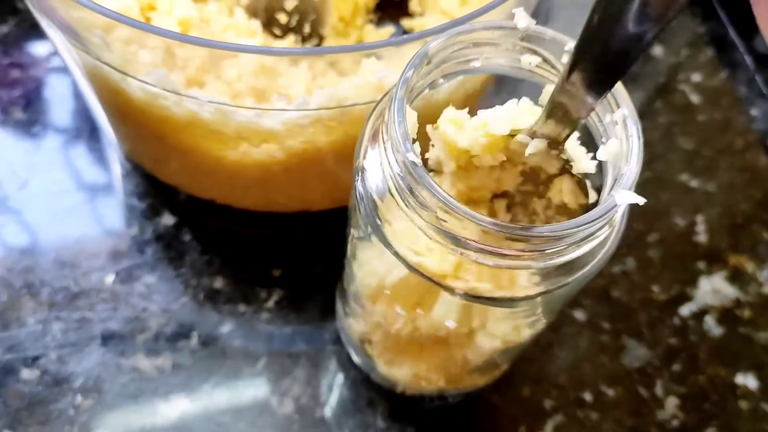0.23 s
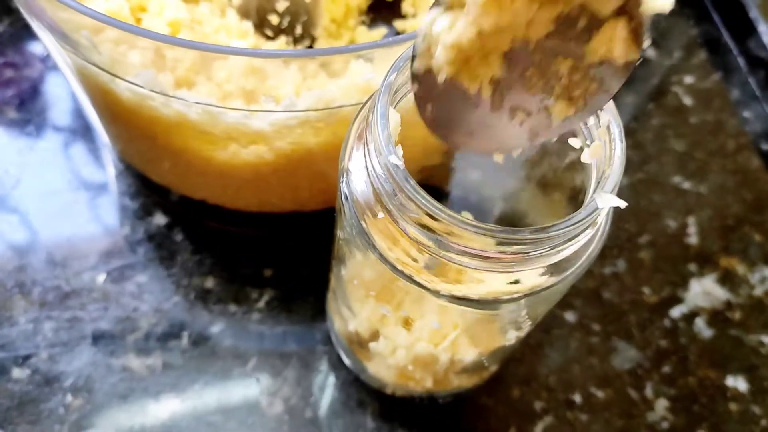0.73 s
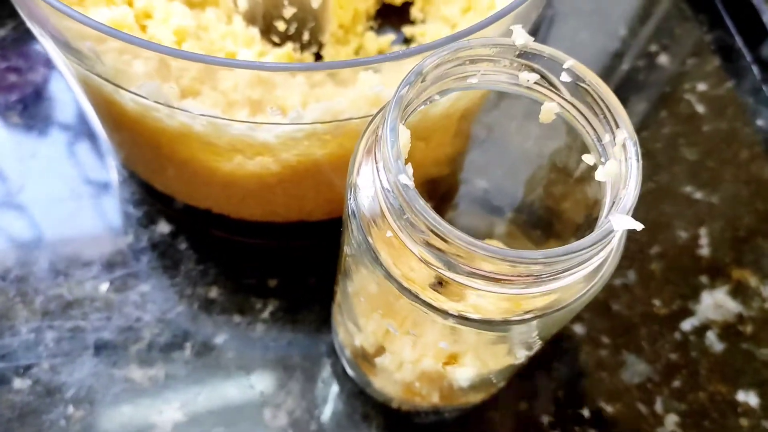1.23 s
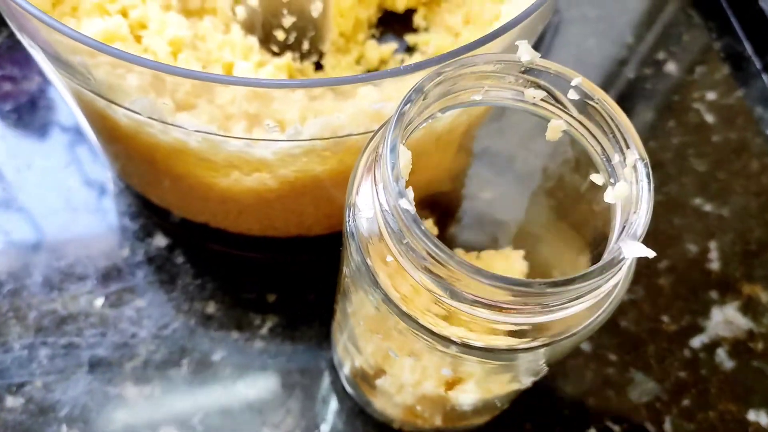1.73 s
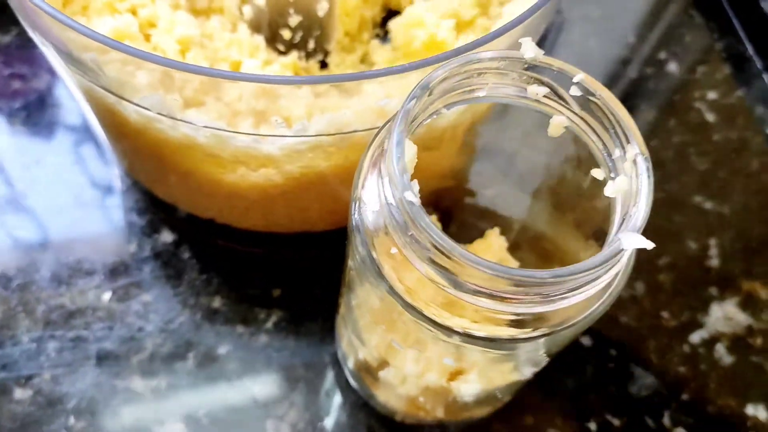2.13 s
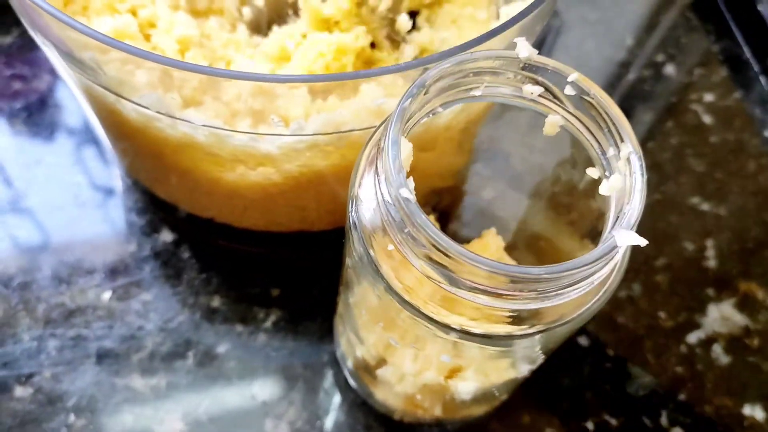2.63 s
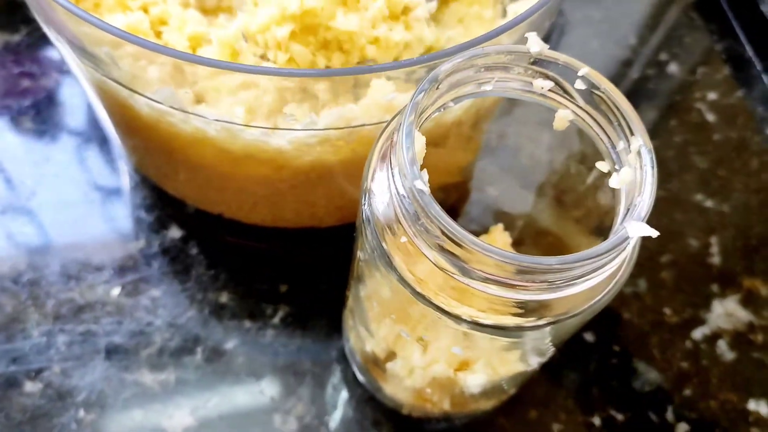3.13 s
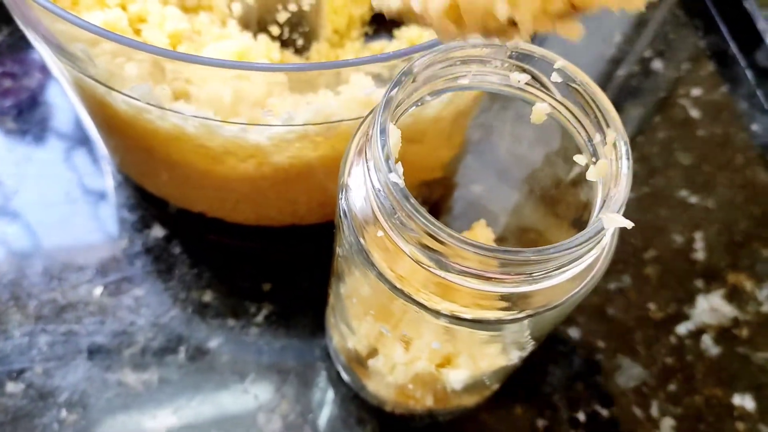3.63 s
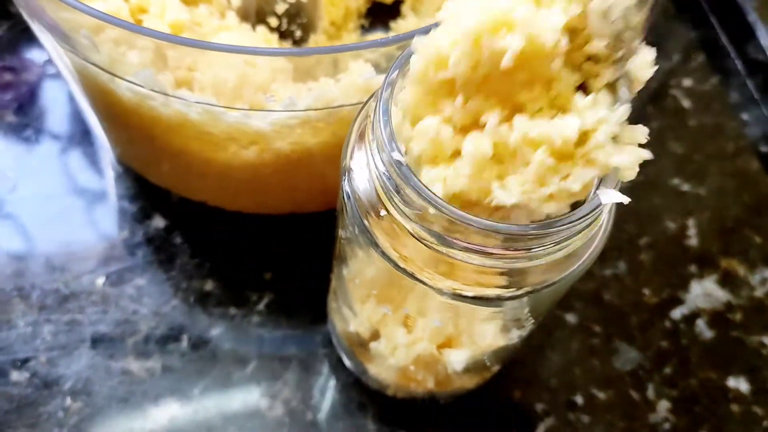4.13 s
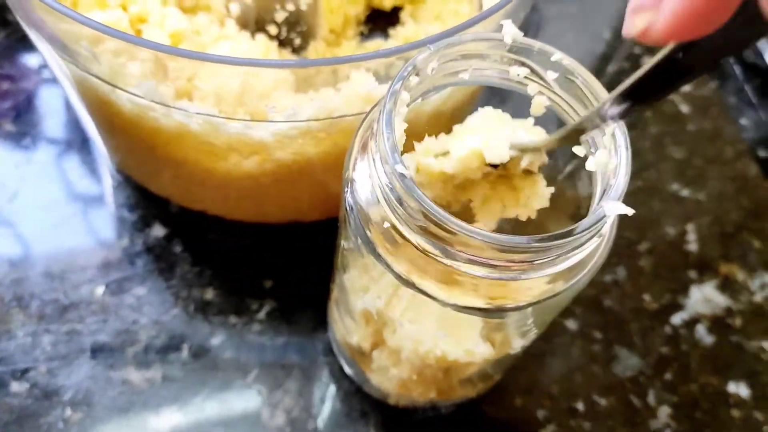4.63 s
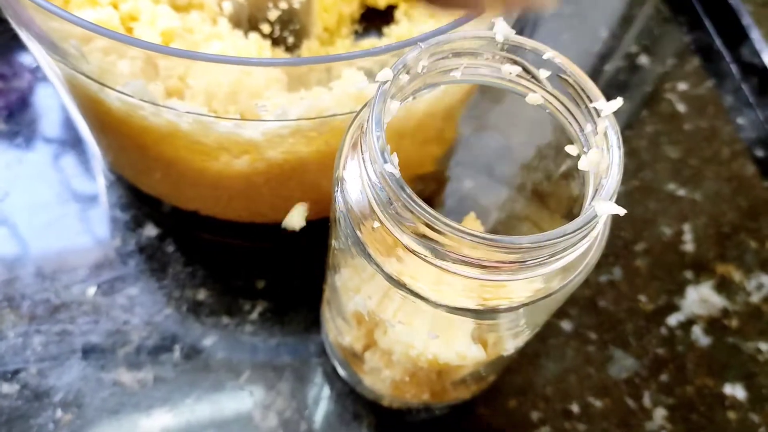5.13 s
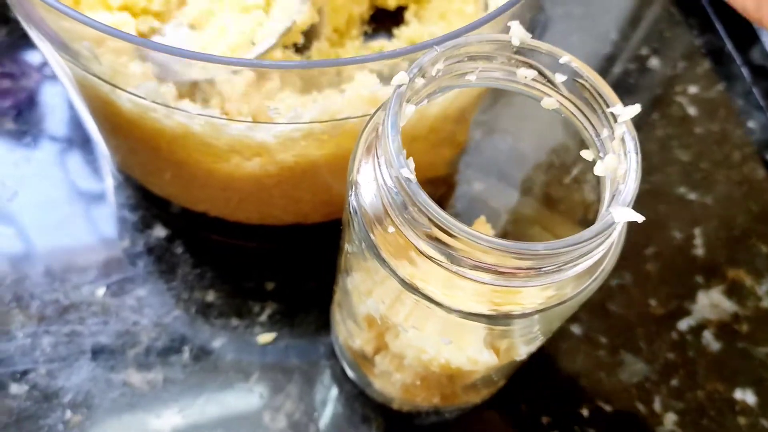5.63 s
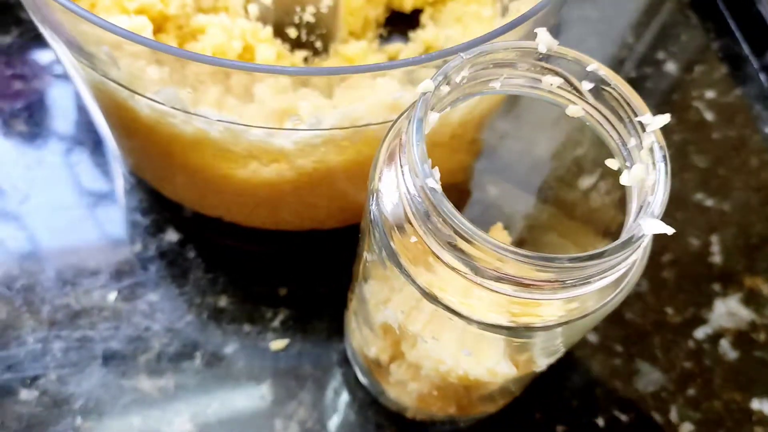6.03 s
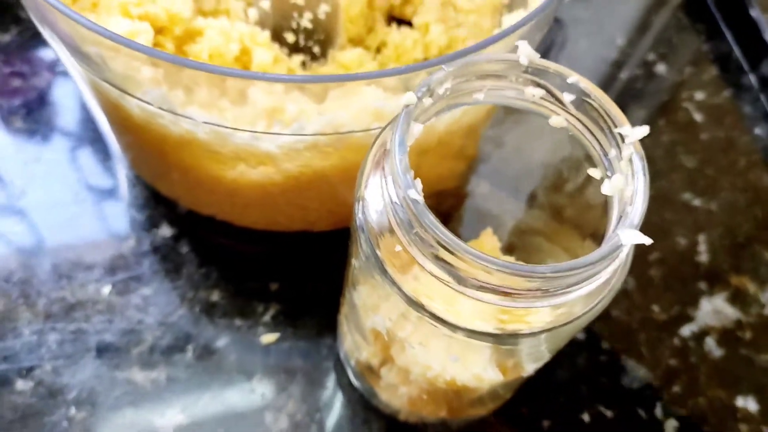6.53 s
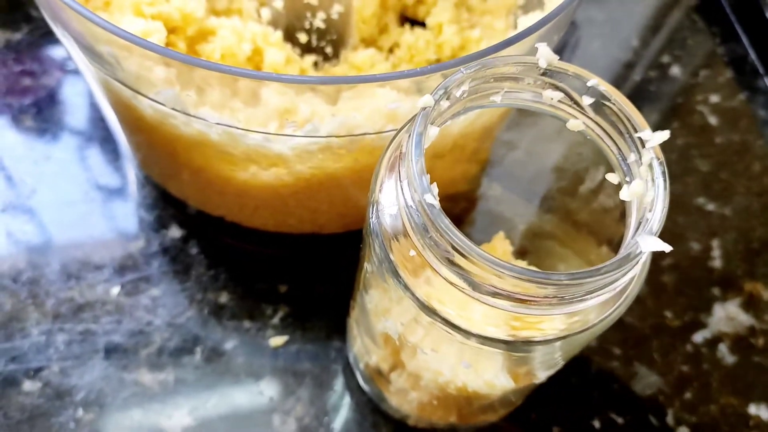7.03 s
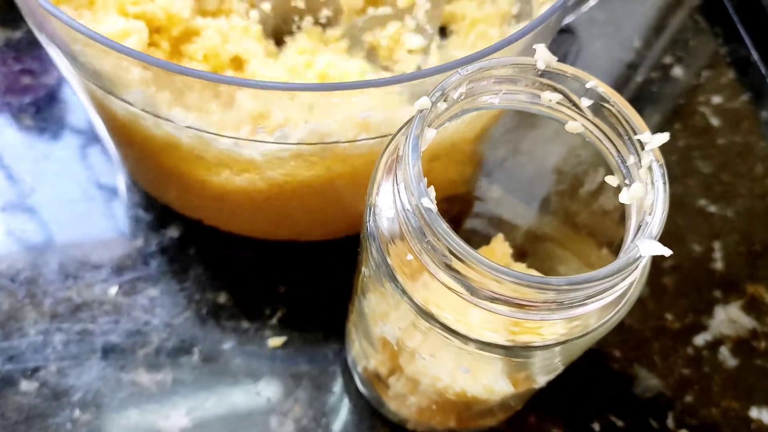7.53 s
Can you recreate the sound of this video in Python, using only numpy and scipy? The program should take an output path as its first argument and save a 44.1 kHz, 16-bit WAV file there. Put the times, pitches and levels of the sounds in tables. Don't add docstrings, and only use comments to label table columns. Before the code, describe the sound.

A small, hard-surfaced kitchen is heard close up through a handheld stereo recorder, with faint appliance hum, far traffic and low hand rumble. At 0.55 s a steel spoon gives a clear, bright clink on a glass jar. Faint gritty, wet scrapes in a plastic bowl follow, strongest from 1.7 to 2.4 s, with a moderate dull knock at 2.25 and a small tap at 2.6. It stays quiet until light glass touches at 4.15-4.2, the loudest ringing clink at 4.75 and a soft rebound at 4.93. A faint scrape comes near 5.6. At 6.0 a brief squealing scrape leads into three very loud, hollow plastic knocks at 6.23, 6.38 and 6.51, slightly overloaded, with rattling bounces and a short room echo. Weaker knocks follow at 7.17 and 7.33, then a crunchy scrape at 7.5 and small closing tick at 7.66, amid handling rumble.

```python
import sys
import numpy as np
from scipy import signal
from scipy.fft import rfft, irfft, next_fast_len
from scipy.io import wavfile
from scipy.ndimage import map_coordinates

SR = 44100
rng = np.random.default_rng(int(sys.argv[2]) if len(sys.argv) > 2 else 0)


def unload_audio(sound):
    columns = np.transpose(np.atleast_2d(sound))
    steps = np.round(np.clip(columns, -1, 1) * 32767)
    wavfile.write(sys.argv[1], SR, steps.astype(np.int16))


def magnitude_from_level(level_db):
    exponent = np.asarray(level_db, float) / 20
    return 10 ** exponent


N = 342657
EDGES_HZ = 22 * 2 ** np.arange(0, 9.7, .4)
CENTRES_HZ = np.sqrt(EDGES_HZ[1:] * EDGES_HZ[:-1])
BANK = [signal.butter(2, edges, "band", fs=SR, output="sos") for edges in zip(EDGES_HZ, EDGES_HZ[1:])]
HALVES = np.array([[.5], [-.5]])
SWELL_RISE, SWELL_SAG_DB = .4, 6


def rms_one(x):
    return x / np.sqrt(np.mean(x ** 2) + 1e-20)


def at_hz(hz_points, values, hz):
    return np.interp(np.log(hz), np.log(hz_points), values)


def drift(rate):
    knots = rng.standard_normal(int(N / SR * rate) + 3)
    coarse = np.arange(0, N + 32, 32)
    curve = map_coordinates(knots, [coarse / SR * rate], order=3)
    return np.interp(np.arange(N), coarse, curve)


def mix(gains, bands):
    return np.tensordot(gains.astype(np.float32), bands, 1)


def strokes(rows, rise, sag_db, quiet_db):
    power = np.full((len(rows[0]) - 2, N + SR), magnitude_from_level(2 * quiet_db))
    for s, length, *level_db in rows:
        u = np.linspace(0, 1, int(length * SR))
        sag = magnitude_from_level(-sag_db * np.maximum(u - rise, 0))
        let_go = np.minimum(8 * (1 - u), 1)
        shape = np.minimum(u / rise, 1) * sag * let_go
        power[:, round(s * SR):][:, :len(u)] += (magnitude_from_level(np.array(level_db))[:, None] * shape) ** 2
    return 10 * np.log10(power[:, :N])


def resonance(x, hz, width_hz):
    r = np.exp(-np.pi * width_hz / SR)
    poles = [1, -2 * r * np.cos(2 * np.pi * hz / SR), r * r]
    return signal.lfilter((1 - r * r) / 2 * np.array([1, 0, -1]), poles, x)


def bowed(source, levels_db, modes):
    out = 0
    for db, (hz, wide, pan_db) in zip(levels_db, modes):
        tone = rms_one(resonance(resonance(source, hz, wide), hz, wide))
        out = out + magnitude_from_level(db + pan_db * HALVES) * tone
    return out


# f/Hz, likeness/-1 to 1
LIKENESS = [(60, -0.45), (130, 0.72), (290, 0.64), (630, 0.26), (1390, 0.23), (3060, -1.1), (6710, 0.65),
            (14700, 0.78)]


def noise_bands(length):
    white = rng.standard_normal((2, 2, length))
    bands = np.empty((len(BANK), 2, length), np.float32)
    alike = np.clip(at_hz(*np.transpose(LIKENESS), CENTRES_HZ), -1, 1)
    alike = np.maximum(alike, .65 * (CENTRES_HZ < 250))
    for k, band in enumerate(BANK):
        weights = np.sqrt(1 + alike[k] * np.array([[1], [-1]]))
        mid, side = signal.sosfilt(band, white[k % 2]) * weights
        bands[k] = mid + side, mid - side
    return bands


# f/Hz, density/dB per Hz
HUM = [(47, -31), (80, -4), (167, -3.5), (231, -8), (398, -15), (483, -18), (778, -12), (1010, -20),
       (2860, -25), (7740, -34), (8630, -35.5), (13300, -36.5), (14200, -28)]


def room_hum(noise, patchy_db):
    gains = magnitude_from_level(at_hz(*np.transpose(HUM), CENTRES_HZ)) * (CENTRES_HZ > 90)
    flickers = (CENTRES_HZ > 90) & (CENTRES_HZ < 1500)
    hum = mix(gains * ~flickers, noise)
    for gain, band in zip(gains[flickers], noise[flickers]):
        hum = hum + gain * band * magnitude_from_level(patchy_db * drift(2.738))
    return magnitude_from_level(-64.5) * rms_one(hum)


# t/s, length/s, level/dB
RUMBLE = [
    (3.0, 0.8, -55.5),
    (3.5, 1, -57.5),
    (6.15, 0.8, -50),
    (6.9, 0.59, -50),
    (7.45, 0.42, -48.5),
]


def hand_rumble(noise):
    low = mix((CENTRES_HZ < 90) * (30 / CENTRES_HZ) ** 0.99, noise)
    level_db = strokes(RUMBLE, SWELL_RISE, SWELL_SAG_DB, quiet_db=-63.5) + 1.6 * drift(4.5)
    return magnitude_from_level(level_db) * rms_one(low)


# t/s, length/s, drag level/dB, wet hiss level/dB, wall squeal level/dB
DRAGS = [(0.0, 0.19, -73, -80, -63.5), (.13, 0.13, -85, -73, -81), (.72, 0.15, -80, -100, -58.5),
         (1.13, 0.17, -69.5, -88, -78), (1.7, 0.14, -69.5, -73.5, -62), (1.8, 0.57, -67.5, -70, -74),
         (1.98, 0.28, -63.5, -90, -75), (2.12, 0.36, -67.5, -70, -89), (4.38, 0.1, -82, -73, -85),
         (5.59, 0.21, -68.5, -76, -88), (6.008, 0.12, -54, -74, -45), (6.11, 0.12, -62, -96, -56.5),
         (7.0, 0.17, -69, -84, -69), (7.482, 0.07, -42.5, -57, -75), (7.53, 0.14, -52, -56, -77),
         (7.64, 0.079, -58.5, -71, -55.5)]
# f/Hz, density/dB per Hz
DRAG_COLOUR = [(150, -25.5), (250, -8.5), (570, -10.5), (806, -7), (1110, -10.5), (1250, -6.5),
               (1700, -12.5), (3620, -13), (3970, -16), (6000, -22), (7800, -54), (13200, -120)]


def drags(noise, grit_db, squeal_hz):
    levels_db = strokes(DRAGS, rise=0.16, sag_db=8, quiet_db=-120)
    level_db, hiss_db, squeal_db = levels_db + drift(25)
    grit = magnitude_from_level(grit_db * drift(150))
    colour = magnitude_from_level(at_hz(*np.transpose(DRAG_COLOUR), CENTRES_HZ)) * (CENTRES_HZ < 6000)
    body = rms_one(mix(colour, noise)[:, ::-1])
    hiss = rms_one(mix(CENTRES_HZ > 6000, noise)[:, ::-1])
    edge = resonance(body, 1300, 150) + 4.7 * resonance(body, 2050, 220) + 1.2 * resonance(body, 3650, 250)
    squeal = rms_one(resonance(resonance(body, squeal_hz, 110), squeal_hz, 110))
    rub = magnitude_from_level(level_db) * (magnitude_from_level(-1.5) * body + magnitude_from_level(-10.5) * rms_one(edge)) + magnitude_from_level(hiss_db) * hiss
    return grit * rub + magnitude_from_level(squeal_db - 5.0) * squeal


# t/s, peak level/dB,
# f/Hz, t60/s
SQUEAKS = [(.012, -85, 3545, 0.4), (0.372, -64.5, 1150, .027), (.785, -56.5, 1172, 0.019),
           (1.161, -79, 2103, 0.19), (1.636, -49.5, 3770, 0.0079), (1.929, -58.5, 216, 0.068),
           (2.054, -59, 1340, 0.024), (2.609, -37.5, 1460, 0.01), (4.1534, -40.5, 3290, 0.027),
           (4.1541, -56, 825, 0.13), (4.193, -27.5, 1090, 0.0084), (4.1931, -38, 3590, 0.012),
           (4.206, -68, 1190, 0.1), (4.512, -77, 3560, 0.084), (4.9341, -36.5, 3565, 0.033),
           (5.783, -65, 3510, 0.023), (6.012, -67, 4220, 0.028), (6.2222, -40, 6500, 0.012),
           (6.2235, -36, 3900, 0.012), (6.3728, -36, 3800, 0.012), (6.3735, -32, 1900, 0.012),
           (7.166, -52, 3700, 0.012), (5.046, -66, 6300, 0.012), (7.3346, -32.5, 1480, 0.014),
           (7.336, -28.5, 405, 0.023), (7.493, -55, 2002, 0.033), (7.506, -38.5, 1417, 0.019),
           (7.507, -44.5, 654, 0.035), (7.526, -44, 1210, 0.046), (7.541, -50, 3620, 0.031),
           (7.606, -49, 1256, 0.041)]


def squeaks(rise_s, glide_hz_per_s):
    t, out = np.arange(SR // 10) / SR, np.zeros(N)
    for s, peak_db, hz, t60 in SQUEAKS:
        sliding_hz = hz + glide_hz_per_s * t * (1000 < hz < 2000)
        ring = np.sin(2 * np.pi * t * sliding_hz) * (1 - np.exp(-t / rise_s))
        out[round(s * SR):][:len(t)] += magnitude_from_level(peak_db + 12.5 - 60 * t / t60) * ring
    return out


# t/s, length/s, low level/dB, middle level/dB, high
# level/dB
DRONE = [
    (0.2, 0.79, -65, -71, -71.5),
    (1.8, 1.14, -63, -61, -93),
    (2.7, 0.78, -71, -67.5, -87),
    (3.2, 0.75, -77, -85, -69.5),
    (4.4, 1.09, -69, -79, -66),
    (5.6, .7, -71, -82, -74),
    (6.15, 0.53, -48.5, -79.5, -52),
    (6.8, 0.92, -63.5, -65.5, -71),
]


def traffic_drone(white):
    levels_db = strokes(DRONE, SWELL_RISE, SWELL_SAG_DB, quiet_db=-79.5)
    return bowed(white, levels_db, [(116.1, 20, .1), (163.2, 31, 0.103), (373, 150, .1)])


def click_bands():
    click = signal.unit_impulse(2048)
    return np.array([signal.sosfilt(band, click) * (-1) ** k for k, band in enumerate(BANK)])


def blows(events, modes, colour_hz, ring_db, rise_s, crack_db, crack_s, spread_db, detune, most_cycles,
          far_db, low_hz, broad):
    hz, mode_db, t60, pan_db = np.transpose(modes)
    t60 = np.minimum(t60, most_cycles / hz)
    t = np.arange(int(3 * t60.max() * SR) // 4) / SR
    short = t[:2048]
    out, order = np.zeros((3, N + SR)), np.argsort(colour_hz)
    noise, click = noise_bands(len(events) * 2048), click_bands()
    chance = rng.standard_normal((len(events), 3, len(hz)))
    tilt = np.sqrt(2000 / (CENTRES_HZ + 300)) * np.minimum(CENTRES_HZ / low_hz, 1) ** 3
    for k, (s, *colour_db) in enumerate(events):
        at = round(s * SR)
        points_hz, points_db = colour_hz[order], np.array(colour_db)[order]
        level = magnitude_from_level(ring_db + mode_db + at_hz(points_hz, points_db, hz) + spread_db * chance[k, 0])
        skew = .5 * chance[k, 1] * np.minimum(hz / 900, 1)
        at_ports = level * magnitude_from_level(pan_db * HALVES) * np.exp(1j * skew * [[1], [-1]])
        loaded = hz * (1 + detune * chance[k, 2])
        turning = (2j * np.pi * loaded - np.log(1000) / t60)[:, None]
        rings = np.exp((t * turning).astype(np.complex64))
        out[:2, at:at + len(t)] += (at_ports @ rings).imag * (1 - np.exp(-t / rise_s))
        tone = magnitude_from_level(crack_db + at_hz(points_hz[broad], points_db[broad], CENTRES_HZ)) * tilt
        crack = np.tensordot(tone, noise[:, :, k * 2048:(k + 1) * 2048], 1)
        crack = 0.77 * crack[0] + 0.19 * crack
        out[:2, at:at + 2048] += crack * np.exp(-short / crack_s) * (1 - np.exp(-short / rise_s))
        out[2, at:at + 2048] += magnitude_from_level(far_db) * tone @ click
    return out[:, :N]


# t/s, first ring level/dB, second ring level/dB, third ring level/dB, top rings level/dB
CLINKS = [
    (0.5478, -31.5, -39.5, -29.5, -48),
    (4.153, -47.5, -52, -43.5, -52),
    (4.1933, -47.5, -49.5, -38.5, -48.5),
    (4.7446, -22.5, -27.5, -37.5, -31),
    (4.9314, -45, -52, -35, -40),
]
# f/Hz, level/dB, t60/s, left minus right/dB
JAR = [(592, -9, 0.11, -8.5), (1200, -6.5, 0.042, -4), (3370, -12, 0.053, -5), (3521, 4, 0.105, -17),
       (3508, -21, .28, -6), (3590, -7.5, 0.04, -3.5), (5535, 0.5, 0.05, 2), (5520, -18, .3, 1.5),
       (5931, -1, 0.06, -7), (5873, -21, .25, -2), (5945, -23, .35, -0.5), (7230, -17.5, .04, -1.5),
       (8250, -15, .1, 2.5), (9190, -9.5, .04, 1), (9313, -23, 0.25, 0.5), (10050, -12, .22, 0),
       (10220, -5.5, .06, -1.5), (12100, -12, .15, 0), (12770, -4.5, .05, -1), (12810, -12, .25, -1),
       (13300, -15, .1, -0.5), (14000, -9, 0.13, -3.5)]


def clinks():
    events = [(*row, -27 + 0.27 * row[1]) for row in CLINKS]
    colour_hz = np.array([3500, 5530, 5930, 9000, 1200])
    return blows(events, JAR, colour_hz, ring_db=0.5, rise_s=.0007, crack_db=7.5, crack_s=0.0063,
                 spread_db=1.2, detune=0, most_cycles=1760, far_db=17, low_hz=430,
                 broad=slice(0, 5, 4))


# t/s, peak level/dB, f/Hz, t60/s, left minus right/dB
RINGS = [(.5478, -44, 3569, 0.5, -7), (.5478, -52, 3510, 0.8, -8), (.5478, -52, 6170, 0.12, 3),
         (.549, -48, 12770, 0.25, 2.5), (2.243, -29, 2900, 0.021, 5), (2.244, -36, 4230, 0.023, -3),
         (2.246, -43, 125, 0.35, 1.5), (2.272, -46.5, 1990, .03, 0), (2.272, -43, 2900, 0.033, 0),
         (4.195, -52, 6200, 0.087, 0.5), (4.193, -64, 5590, .25, 0.5), (4.9318, -44, 3601, 0.24, -4),
         (4.9314, -56, 5986, .35, -2.5), (5.047, -56, 3600, 0.05, -8.5), (4.7446, -44, 3575, 0.3, -7),
         (6.2265, -17.5, 3983, 0.042, -11), (6.2265, -22.5, 3650, 0.026, -1.5),
         (6.2265, -22.5, 2070, 0.053, 4), (6.228, -27, 223, .25, -2), (6.228, -26, 268, .3, 1),
         (6.378, -27, 266, .3, 1), (6.228, -34, 125, .3, -3.5), (6.227, -17.5, 612, 0.055, -18),
         (6.254, -28, 1600, 0.056, 0.5), (6.274, -28.5, 1740, .04, -3), (6.227, -25, 1030, 0.06, 4),
         (6.376, -25.5, 3960, 0.066, -3), (6.379, -31, 126, 0.43, -2), (6.377, -20, 912, 0.14, -9),
         (6.405, -39.5, 3520, .12, -5), (6.511, -13.5, 612, 0.12, -11), (6.512, -28, 1400, 0.034, 5),
         (6.511, -26, 1940, 0.07, -6), (7.168, -31, 1400, 0.057, 10), (7.168, -40, 1026, 0.041, -20.5),
         (7.168, -27.5, 1963, 0.059, -7), (7.168, -20, 3730, 0.026, -4), (7.235, -61, 1350, .12, -2.5),
         (7.515, -54, 2020, .04, -5), (4.1532, -53.5, 3560, 0.28, -9), (4.194, -61.5, 3630, 0.29, -1),
         (4.745, -32.5, 9300, .06, 0.5)]


def favoured_rings(rise_s):
    t, out = np.arange(SR // 2) / SR, np.zeros((2, N + SR))
    for s, peak_db, hz, t60, pan_db in RINGS:
        ring = np.sin(2 * np.pi * hz * t) * (1 - np.exp(-t / rise_s))
        out[:, round(s * SR):][:, :len(t)] += magnitude_from_level(peak_db + pan_db * HALVES - 60 * t / t60) * ring
    return out[:, :N]


# f/Hz, t60/s, level/dB
KITCHEN = [(100, 1, -7.5), (388, 0.48, -9.5), (1540, 0.61, -15.5), (4140, 0.62, -10.5), (4800, 0.5, -17),
           (6500, 0.55, -18.5), (8940, 0.59, -21), (15500, 0.12, -12)]


def kitchen(x, gap_s):
    t = np.arange(int(.8 * SR)) / SR
    hz, t60, level_db = np.transpose(KITCHEN)
    start_db = at_hz(hz, level_db, CENTRES_HZ)[:, None]
    fade = magnitude_from_level(start_db - 60 * t / at_hz(hz, t60, CENTRES_HZ)[:, None])
    echoes = np.sum(noise_bands(len(t)) * fade[:, None], axis=0)
    echoes = echoes * (1 - np.exp(-(t / gap_s) ** 2)) / 20
    return signal.fftconvolve(x[None], echoes, axes=1)[:, :N]


# t/s, tick level/dB, counter thump level/dB, belly level/dB, rim level/dB
KNOCKS = [(0.9675, -57.5, -67.5, -53.5, -78), (1.6337, -54, -51.5, -74, -48), (1.9545, -51, -40, -45, -57),
          (2.2443, -29.5, -33, -28, -24.5), (2.6075, -57, -52.5, -30, -39.5), (5.7808, -54, -90, -57, -47),
          (6.2253, -14.5, -35, -13, -5), (6.2279, -14, -12, -6.5, -8.5), (6.3745, -14.5, -47, -8, -3.5),
          (6.3775, -20.5, -17, -7.5, -10), (6.5066, -19.5, -25, -18.5, -23), (6.5114, -31, -20, -10, -9),
          (7.1676, -35, -46.5, -56.5, -25), (7.1676, -27, -28.5, -15.5, -12),
          (7.1824, -42, -34.5, -27.5, -28.5), (7.3337, -37, -52, -19.5, -31.5),
          (7.4874, -49, -29.5, -44, -35), (7.6594, -61, -60.5, -44, -46)]
# f/Hz, level/dB, t60/s, left minus right/dB
BOWL = [(128.1, -9.5, 0.37, 1.5), (219.2, -8.5, 0.29, -5), (271, -8, 0.22, 6), (387, 4.5, 0.03, -2.5),
        (612, -4.5, 0.028, -22.5), (663, -8, 0.012, -12.5), (863, -10.5, 0.1, -10), (953, -8, 0.09, 4),
        (1250, -3.5, 0.014, 10.5), (1550, -18.5, 0.03, 21), (1882, 1.5, 0.047, -5.5),
        (2220, -19, .02, -25.5), (2950, -1, .015, -10), (3560, 8.5, .015, -2), (4376, 2.5, .012, -13.5),
        (6110, -3, .01, -30.5)]


def knocks():
    events = [(*row, 0.74 + np.mean(row[3:])) for row in KNOCKS]
    colour_hz = np.array([5000, 170, 395, 1600, 620])
    return blows(events, BOWL, colour_hz, ring_db=-5.5, rise_s=.0012, crack_db=2.5, crack_s=0.004,
                 spread_db=4.5, detune=0.029, most_cycles=40, far_db=18.5, low_hz=128, broad=slice(None))


# t/s, length/s, wall level/dB, rim level/dB, edge level/dB
CHATTER = [
    (2.25, 0.045, -45, -47.5, -52),
    (2.268, 0.018, -42, -38, -48),
    (6.238, 0.055, -22.5, -25.5, -37.5),
    (6.29, 0.099, -37, -35.5, -49),
    (6.383, 0.063, -32.5, -35.5, -42),
    (6.514, 0.036, -22.5, -30.5, -40),
    (6.55, 0.237, -47, -61, -69),
    (7.49, 0.047, -55.5, -58, -70),
    (7.535, 0.13, -62.5, -75, -54.5),
]


def chatter(white):
    levels_db = strokes(CHATTER, rise=.1, sag_db=8, quiet_db=-120) + 2.5 * drift(150)
    return bowed(white, levels_db, [(628, 138, -8.0), (1727, 1000, -5.5), (3620, 340, -7.5)])


# t/s, level/dB, f/Hz, length/s, left minus right/dB
HELD = [
    (6.261, -30, 3505, 0.028, -6.5),
    (6.267, -20, 612, 0.021, -8),
    (6.522, -25, 640, 0.024, -8),
]


def held_rings():
    rise_s, choke_t60_s = .002, .03
    t, out = np.arange(SR // 5) / SR, np.zeros((2, N))
    for s, level_db, hz, length, pan_db in HELD:
        choke = magnitude_from_level(-60 * np.maximum(t - length, 0) / choke_t60_s)
        ring = np.sin(2 * np.pi * hz * t) * (1 - np.exp(-t / rise_s)) * choke
        out[:, round(s * SR):][:, :len(t)] += magnitude_from_level(level_db + pan_db * HALVES) * ring
    return out


# f/Hz, phase/rad
PORT_PHASE = [(150, .1), (400, .3), (620, 1), (2000, 1.3), (2900, 1.6), (3500, 0.28), (6000, .4),
              (8500, 1.4), (15000, 0.98)]


def ports(near):
    size = next_fast_len(N)
    lead = at_hz(*np.transpose(PORT_PHASE), np.arange(1, size // 2 + 2) * SR / size)
    late = irfft(rfft(near[1], size) * np.exp(-1j * lead), size)[:N]
    return np.array([near[0], late])


def scene():
    noise = noise_bands(N)
    white = noise.sum(axis=0)
    steady = room_hum(noise, patchy_db=3.0) + hand_rumble(noise)
    steady = steady + drags(noise, grit_db=0.5, squeal_hz=812) + traffic_drone(white)
    jar, bowl, bounces = clinks(), knocks(), chatter(white)
    rings = favoured_rings(rise_s=0.00069) + held_rings()
    near = rings + jar[:2] + bowl[:2] + bounces + squeaks(rise_s=0.0021, glide_hz_per_s=2400)
    far = jar[2] + bowl[2] + magnitude_from_level(-12.5) * rings[1]
    far = far + magnitude_from_level(-14.5) * jar[1] + magnitude_from_level(-15) * bowl[1] + magnitude_from_level(-13) * bounces[1]
    echoed = steady + kitchen(far, gap_s=0.002)
    soft_top = signal.cheby2(10, 40, 14700, fs=SR, output="sos")
    return ports(near) + signal.sosfilt(soft_top, echoed)


def band_limit(x):
    return signal.sosfilt(signal.butter(12, 15320, fs=SR, output="sos"), x)


def record(dry):
    overloaded = 1.605 * np.tanh(dry / 1.125)
    dull = signal.sosfilt(signal.cheby2(8, 35, 15250, fs=SR, output="sos"), overloaded)
    return band_limit(np.clip(dull, -.99, .99))


dry = scene()
out = record(dry)
unload_audio(out)
```